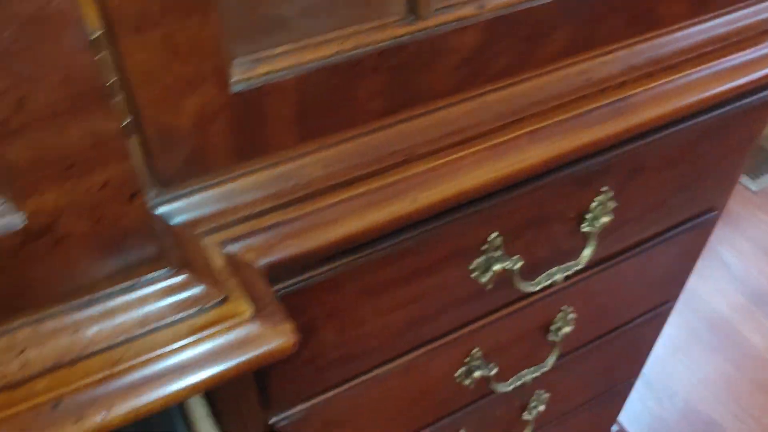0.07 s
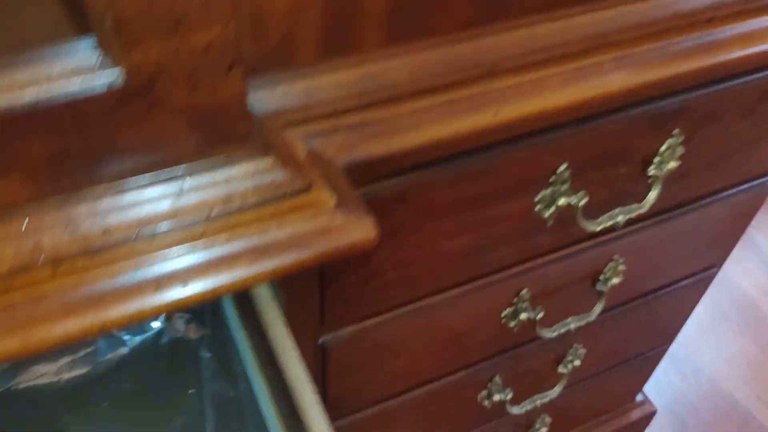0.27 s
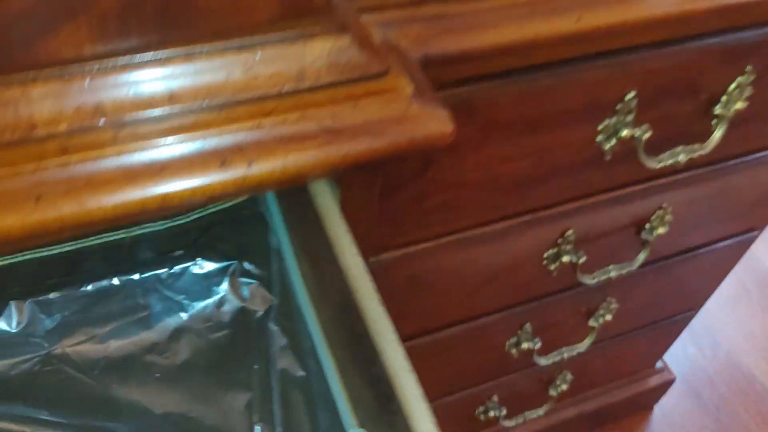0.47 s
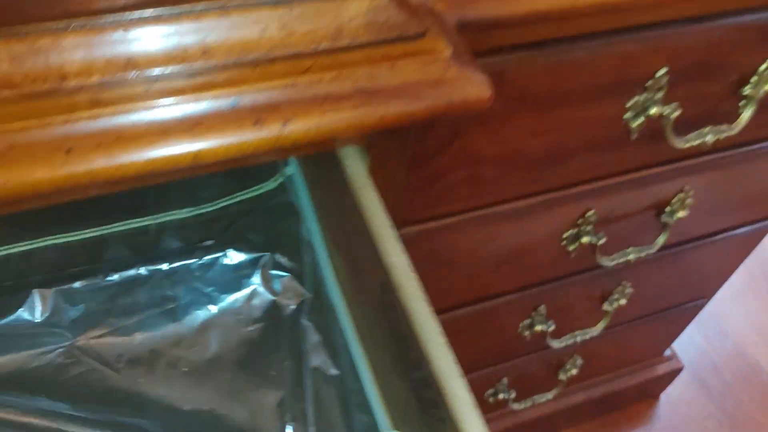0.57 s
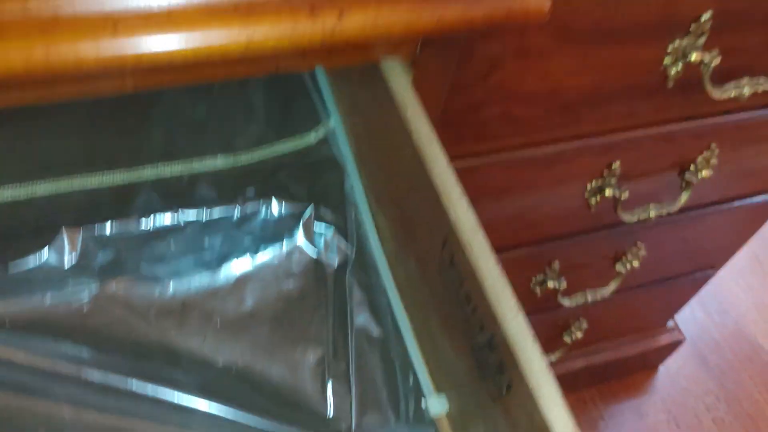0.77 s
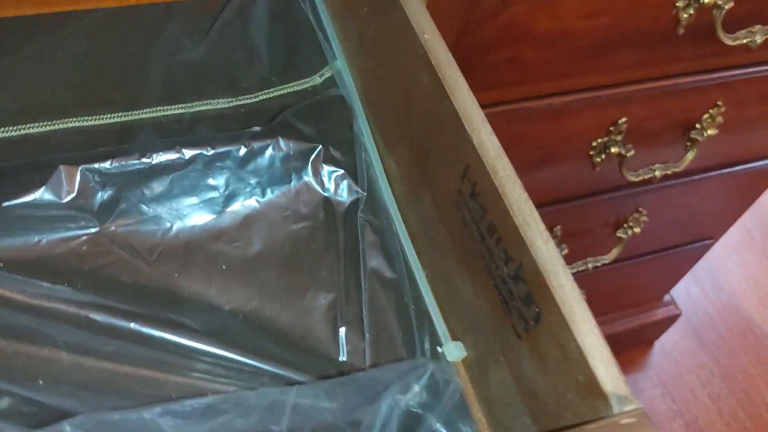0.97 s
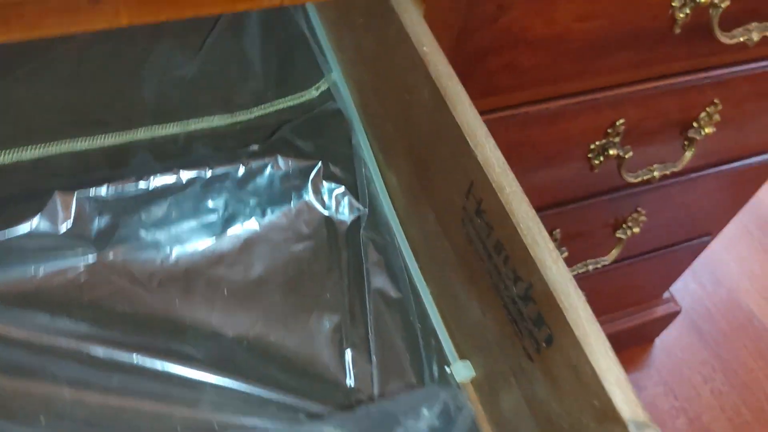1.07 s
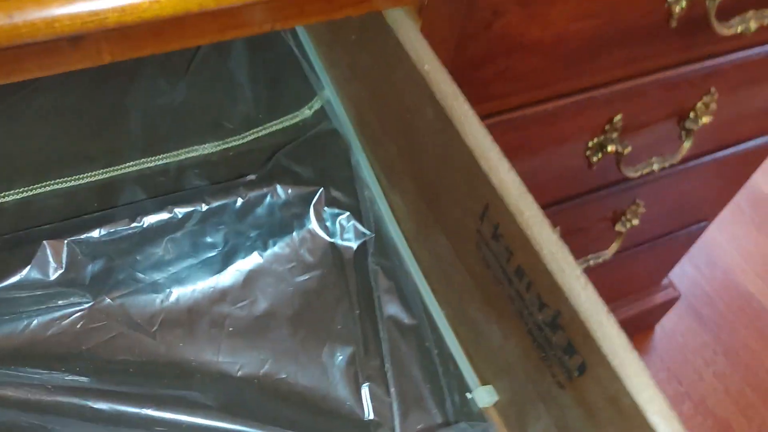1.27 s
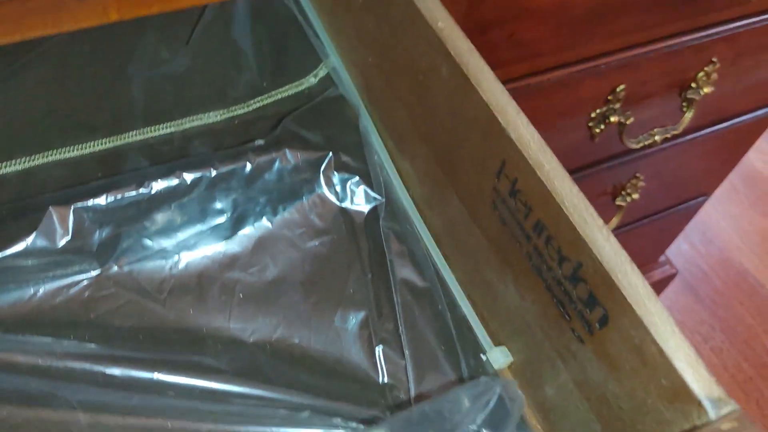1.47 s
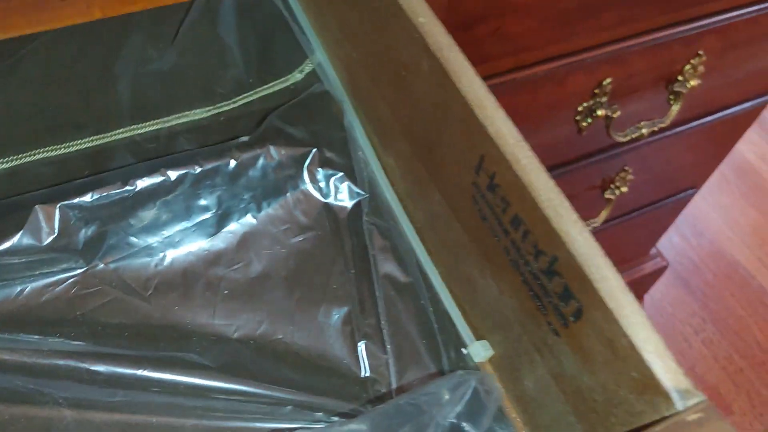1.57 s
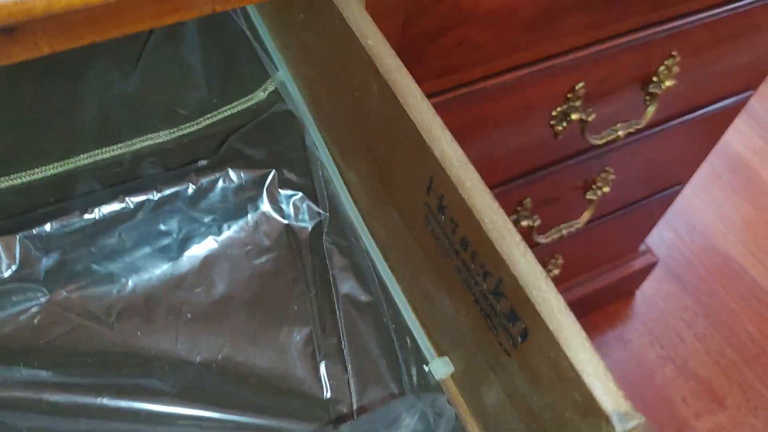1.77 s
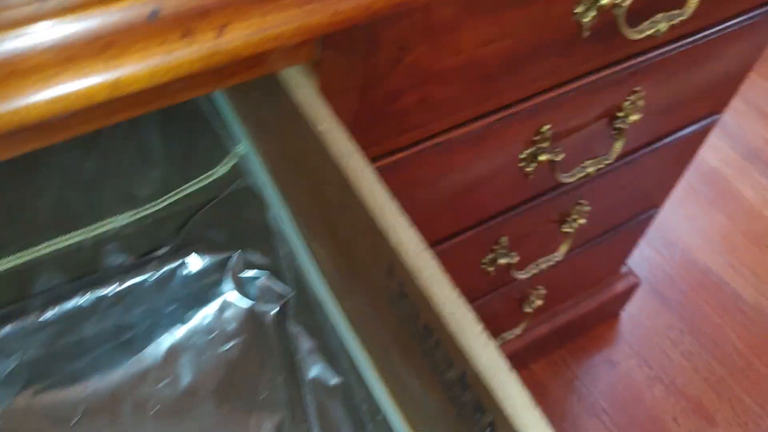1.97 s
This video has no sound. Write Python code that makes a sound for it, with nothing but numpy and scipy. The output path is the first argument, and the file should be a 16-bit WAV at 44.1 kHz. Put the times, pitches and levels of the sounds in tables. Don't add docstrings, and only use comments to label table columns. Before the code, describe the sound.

A wooden drawer slides open with a tick and hollow rumble, then is pushed back, squeaking and clacking.

```python
import sys
import numpy as np
from scipy import signal
from scipy.fft import rfft, irfft, next_fast_len
from scipy.io import wavfile
from scipy.ndimage import uniform_filter1d

SR = 44100
rng = np.random.default_rng(int(sys.argv[2]) if len(sys.argv) > 2 else 0)


def boost(x):
    u = np.asarray(x, float) / 20
    return 10 ** u


def generate_wav(signal):
    frames = np.transpose(np.atleast_2d(signal))
    scaled = np.clip(frames, -1, 1) * 32767
    pcm = np.round(scaled).astype(np.int16)
    wavfile.write(sys.argv[1], SR, pcm)


N = 88508

# f/Hz, width/Hz, level/dB
BOX = [(63.6, 176, -19.5), (110, 47, -7.5), (151, 31.6, -3.5), (196.8, 22.6, 3), (218, 21, -3.5),
       (242, 24.4, -8)]
# f/Hz, width/Hz, level/dB
SLATS = [(301, 60, -5.5), (401.3, 52, 0), (500, 32, 2.5), (639, 94, -5.5), (710, 51, -8.5), (1010, 69, -14)]
# f/Hz, width/Hz, level/dB
RAILS = [(1480, 350, -8.5), (1870, 110, 5), (2440, 280, -18), (2667, 180, 1.5), (3306, 116, -4.5),
         (4024, 270, 2.5), (4800, 840, -13.5), (5380, 310, -3.5), (6270, 160, -4.5), (7540, 1170, -3),
         (9400, 1700, -25), (12100, 680, -30)]
# f/Hz, level/dB, time to fall by 60 dB/s
BRASS = [(1027, -18, 0.081), (1370, -18.5, .015), (2310, -16, 0.036), (2850, -24, 0.06), (3190, -3, 0.028),
         (3670, -12.5, 0.016), (4040, -9, 0.038), (4320, -7.5, 0.02), (5140, -4, .012), (6240, -6, 0.015),
         (6660, -8, 0.046), (9100, -33, 0.027), (10700, -14.5, 0.13), (14450, -6, 0.18)]


def in_time(rows):
    s, *columns = np.transpose(rows)
    return [np.interp(np.arange(N) / SR, s, c) for c in columns]


def at_hz(points, hz):
    f, db = np.array(points).T
    return np.interp(np.log(hz + 1), np.log(f), db)


def rms_one(x):
    return x / np.sqrt(np.mean(x ** 2) + 1e-20)


def colour(x, db, turn=0):
    return irfft(rfft(x) * boost(db) * np.exp(1j * turn), x.shape[-1])


def high_pass(x, order, hz):
    return signal.sosfilt(signal.butter(order, hz, "high", fs=SR, output="sos"), x)


def resonate(x, hz, width_hz):
    r = np.exp(-np.pi * width_hz / SR)
    top = [(1 - r * r) / 2, 0, (r * r - 1) / 2]
    bottom = [1, -2 * r * np.cos(2 * np.pi * hz / SR), r * r]
    return signal.lfilter(top, bottom, x + 1e-18)


def body(x, peaks):
    return sum((-1) ** k * boost(db) * resonate(x, hz, width) for k, (hz, width, db) in enumerate(peaks))


def grains(per_s, spread_db):
    born = rng.random(N) < per_s / SR
    size_db = spread_db * np.minimum(rng.exponential(1, N), 4)
    return born * rng.choice([-1, 1], N) * boost(size_db)


def bump(middle, half):
    return np.exp(-.5 * ((np.arange(N) / SR - middle) / half) ** 2)


def burst(start, t60):
    t = np.arange(N) / SR - start
    return (t >= 0) * boost(-60 * np.maximum(t, 0) / t60) * rng.standard_normal(N)


def drift(size):
    once = uniform_filter1d(rng.standard_normal(N), size=size)
    return rms_one(uniform_filter1d(once, size=size))


def patchy(peaks, per_s, spread_db):
    patch_db, patch_samples, wander_share = 4, 2200, .03
    out = 0
    for hz, width, db in peaks:
        level = boost(db + patch_db * drift(patch_samples))
        rubbed = level * resonate(grains(per_s, spread_db), hz, width)
        read_at = np.cumsum(1 + wander_share * drift(patch_samples))
        out = out + np.interp(read_at, np.arange(N), rubbed)
    return rms_one(out)


def house():
    # f/Hz, level/dB per Hz
    air = [(30, -13), (100, -4), (220, 0), (450, -3), (1400, -17), (3000, -21), (8000, -25), (9500, -36)]
    hz = np.fft.rfftfreq(N, 1 / SR)
    mid, side = colour(rng.standard_normal((2, N)), at_hz(air, hz))
    side = high_pass(side, 1, 250)
    return boost(-63) * rms_one(np.array([.8 * (mid + side), mid - side]))


def film():
    # middle t/s, half length/s, level/dB, share of the lower whistle/dB
    rustles = [
        (0.09, 0.0094, -56.5, 1),
        (0.113, 0.0035, -71, 21.5),
        (1.778, 0.048, -67, -6),
        (1.896, 0.013, -58.5, -9),
    ]
    # f/Hz, width/Hz
    bands = [(8000, 880), (11200, 2300)]
    low, high = [rms_one(resonate(resonate(grains(9000, 3.5), hz, w), hz, 2 * w)) for hz, w in bands]
    return sum(boost(db) * bump(s, half) * (high + boost(low_db) * low) for s, half, db, low_db in rustles)


def handle():
    # t/s, level/dB
    clacks = [(1.9551, -4), (1.9563, -5), (1.9598, -10), (1.9628, -25), (1.9661, -17), (1.9722, -16),
              (1.9745, -20.5), (1.9805, -20), (1.983, -16.5), (1.9905, -16.5), (1.9985, -18.5)]
    crack_db, crack_t60_s = 6, .003
    out = sum(boost(db + crack_db) * burst(s, crack_t60_s) for s, db in clacks)
    out = signal.sosfilt(signal.butter(2, [1800, 8500], "band", fs=SR, output="sos"), out)
    scatter_db = rng.normal(0, 2.5, (len(clacks), len(BRASS)))
    for k, (hz, mode_db, t60) in enumerate(BRASS):
        for (s, db), own_db in zip(clacks, scatter_db[:, k]):
            i = int(s * SR)
            t = np.arange(N - i) / SR
            ring_db = db + mode_db + own_db - 10.5 - 60 * t / t60
            out[i:] += boost(ring_db) * np.sin(2 * np.pi * hz * t)
    return out


def push():
    # t/s, scrape/dB, boom/dB
    strength = [(1.9, -55, -83), (1.918, -56, -82), (1.928, -40, -70), (1.934, -28.5, -66),
                (1.942, -28, -66), (1.95, -29.5, -43), (1.958, -39, -25.5), (1.968, -52, -29.5),
                (1.98, -22, -28), (1.99, -31.5, -31), (2.005, -22.5, -24.5)]
    # f/Hz, level/dB
    scrape_colour = [(500, -23), (1300, 1), (2300, 3.5), (3200, 3), (5500, -13), (8200, 6), (9400, -5),
                     (11500, -9.5)]
    # f/Hz, width/Hz, level/dB
    boom_panels = [(199.6, 19, -12), (356, 70, 0.5), (400, 84, -2.5), (505, 98, -6.5), (700, 28, -7.5),
                   (994, 37, -6.5)]
    scrape_db, boom_db = in_time(strength)
    on = np.clip((np.arange(N) / SR - strength[0][0]) * 200, 0, 1)
    grit = grains(5000, 2.0)
    jingle = 0
    for hz, db, t60 in BRASS:
        level_db = db - 10 * np.log10(.1 / t60) + 2.2 * drift(300)
        jingle = jingle + boost(level_db) * resonate(grit, hz, 2.0 / t60)
    rough = colour(grit, at_hz(scrape_colour, np.fft.rfftfreq(N, 1 / SR)))
    scrape = rms_one(rms_one(rough) + 0.71 * rms_one(jingle))
    boom = rms_one(high_pass(body(grains(900, 1.3), boom_panels), 2, 150))
    return on * (boost(scrape_db) * scrape + boost(boom_db) * boom)


def groan():
    # t/s, f/Hz, level/dB
    sag = [(1.93, 403, -84), (1.938, 412, -37), (1.953, 393, -39.5), (1.962, 371, -25), (1.974, 350, -33),
           (1.98, 338, -37), (1.992, 334, -24.5), (2.006, 330, -48)]
    hz, db = in_time(sag)
    on = np.arange(N) / SR > sag[0][0]
    return on * boost(db + 2 * drift(150)) * np.sin(2 * np.pi * np.cumsum(hz) / SR)


def squeak():
    # t/s, f/Hz
    pitch = [(1.9, 1923), (1.92, 2013), (1.935, 2010), (1.95, 2080)]
    # multiple of the pitch, level/dB, start t/s, peak t/s, end t/s
    overtones = [
        (1, -33, 1.888, 1.936, 1.958),
        (2, -30, 1.908, 1.927, 1.952),
        (3, -44, 1.914, 1.926, 1.936),
        (4, -52, 1.912, 1.928, 1.94),
        (.5, -42, 1.92, 1.932, 1.95),
    ]
    wobble_share, flutter_db = 0.0028, 2
    hz = in_time(pitch)[0] * (1 + wobble_share * drift(100))
    phase = 2 * np.pi * np.cumsum(hz) / SR
    out = 0
    for multiple, db, start, peak, end in overtones:
        swell = np.interp(np.arange(N) / SR, [start, peak, end], [0, 1, 0]) ** 2
        out = out + boost(db + flutter_db * drift(60)) * swell * np.sin(multiple * phase)
    return out


def tick():
    peaks = [(hz, width, db / 3) for hz, width, db in RAILS] + [(4000, 270, 9.5)]
    return boost(-24) * body(burst(.0065, 0.0078), peaks)


def jolts():
    # t/s, level/dB, contact cut f/Hz (higher is a harder contact)
    hits = [(.036, -30, 400), (0.054, -20.5, 248), (0.0593, -23, 248), (.069, -34.5, 303),
            (0.118, -37.5, 500), (0.221, -34, 400), (.262, -27.5, 300), (0.344, -33.5, 900),
            (.372, -30.5, 600), (0.402, -31, 400), (0.437, -23.5, 400), (0.4528, -21, 800),
            (.484, -25.5, 596), (.53, -33, 400), (0.644, -42, 400), (0.689, -32.5, 400),
            (0.763, -39.5, 400), (0.813, -41, 600), (.86, -47, 700), (0.914, -41, 700), (1.863, -49, 884),
            (1.876, -60, 500)]
    force = np.zeros(N)
    for s, db, cut_hz in hits:
        t = np.maximum(np.arange(N) / SR - s, 0) * 2 * np.pi * cut_hz
        force -= boost(db + 29.5) * cut_hz / 1000 * t * np.exp(-t)
    return body(force, BOX) + boost(-11) * body(force, SLATS)


def rumble():
    # t/s, big panels/dB, small panels/dB, runners/dB
    speed = [(.02, -27, -38, -50), (.045, -44, -55, -60.5), (.09, -34, -51.5, -53), (.14, -27.5, -52, -57),
             (.19, -45, -53.5, -63.5), (.24, -46, -52, -60.5), (.3, -42, -54, -59), (.37, -38.5, -53, -60),
             (.42, -39.5, -51.5, -66.5), (.47, -48, -53.5, -64.5), (.53, -41, -53.5, -68),
             (.6, -51, -60, -70), (.68, -43, -61.5, -70), (.75, -50, -59, -67), (.83, -57, -58, -68),
             (.92, -59, -54.5, -83)]
    # middle t/s, half length/s, hiss/dB, knock/dB
    creeps = [
        (1.76, .025, -72, -70),
        (1.865, .025, -69, -64),
    ]
    snags_per_s, snag_spread_db = 550, 3.5
    t = np.arange(N) / SR
    boom_db, knock_db, hiss_db = in_time(speed)
    moving = .5 - .5 * np.tanh((t - .96) / .05)
    boom = rms_one(body(grains(snags_per_s, snag_spread_db), BOX))
    boom = boom * np.interp(t, [.1, .2], [.25, 1])
    knock = patchy(SLATS, snags_per_s, snag_spread_db)
    hiss = patchy(RAILS, 6000, 4)
    rub = boost(boom_db + 2) * boom + boost(knock_db + 2) * knock + boost(hiss_db - 2.5) * hiss
    creep = sum(bump(s, half) * (boost(h_db) * hiss + boost(k_db) * knock) for s, half, h_db, k_db in creeps)
    return moving * rub + creep


def slide():
    return rumble() + jolts() + tick()


def ports(x, lean, room_db):
    left_lag_s, room_t60_s = .00021, .13
    size = next_fast_len(N + SR // 2)
    hz = np.fft.rfftfreq(size, 1 / SR)
    t = np.arange(SR // 2) / SR
    lean_db = np.array([[.5], [-.5]]) * at_hz(lean, hz)
    lag_turn = [[-2 * np.pi * left_lag_s], [0]] * hz
    direct = colour(np.pad(x, (0, size - N)), lean_db, lag_turn)
    tail = rng.standard_normal((2, SR // 2)) * boost(-60 * t / room_t60_s) * (t > .0015)
    tail = high_pass(tail / np.sqrt(np.sum(tail[0] ** 2)), 2, 746)
    room = irfft(rfft(direct) * rfft(tail, size), size)
    return (direct + boost(room_db) * room)[:, :N]


def scene():
    # f/Hz, level/dB
    wood_lean = [(150, -4.5), (400, -3.5), (900, -2.5), (1800, 9.5), (2500, 23), (5400, 0), (8000, -6),
                 (11000, 15.5)]
    # f/Hz, level/dB
    brass_lean = [(150, -4.5), (600, -5.5), (1800, 9.5), (2600, 9.5), (4000, 5), (5400, -0.5), (8000, -7.5),
                  (11000, 16)]
    brass = high_pass(film() + handle() + push() + groan() + squeak(), 3, 170)
    return house() + ports(brass, brass_lean, -0.5) + ports(slide(), wood_lean, 5.5)


def low_pass(x):
    return signal.sosfilt(signal.butter(12, 15610, fs=SR, output="sos"), x)


def record(dry):
    x = high_pass(dry, 2, 55)
    below = signal.sosfiltfilt(signal.butter(16, 12600, fs=SR, output="sos"), x)
    faint_top = boost(-34) * (x - below)
    return low_pass(np.clip(below, -1, 1) + faint_top)


dry = scene()
out = record(dry)
generate_wav(out)
```